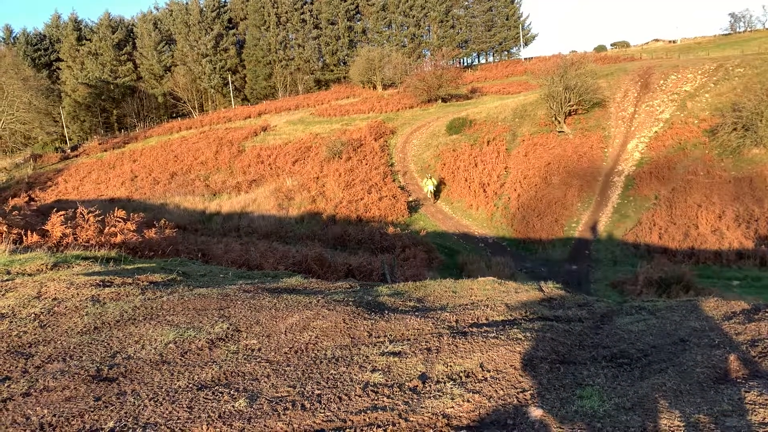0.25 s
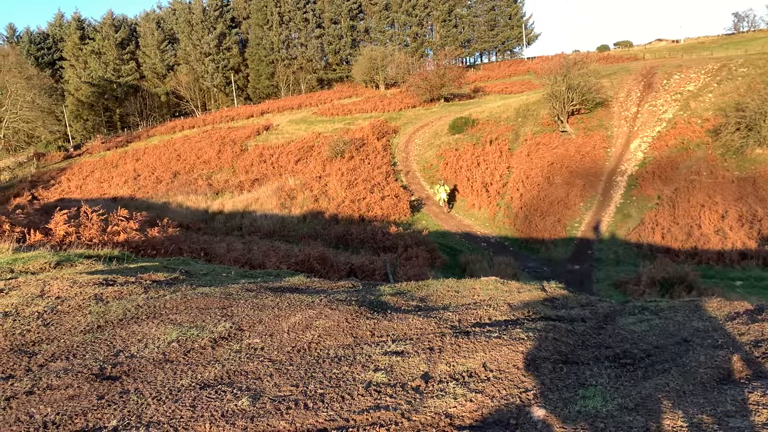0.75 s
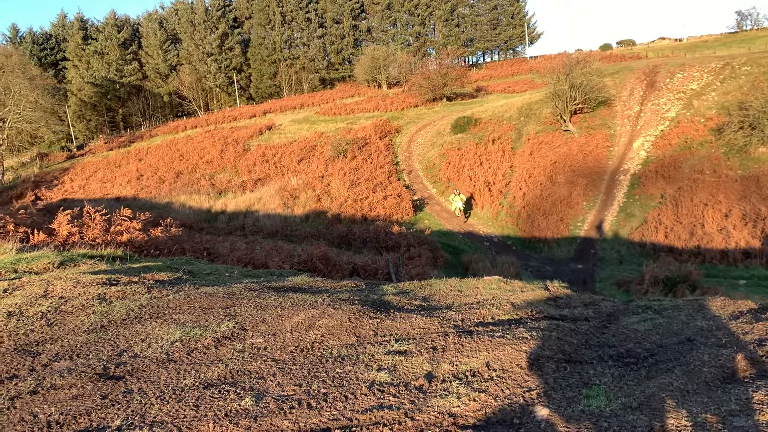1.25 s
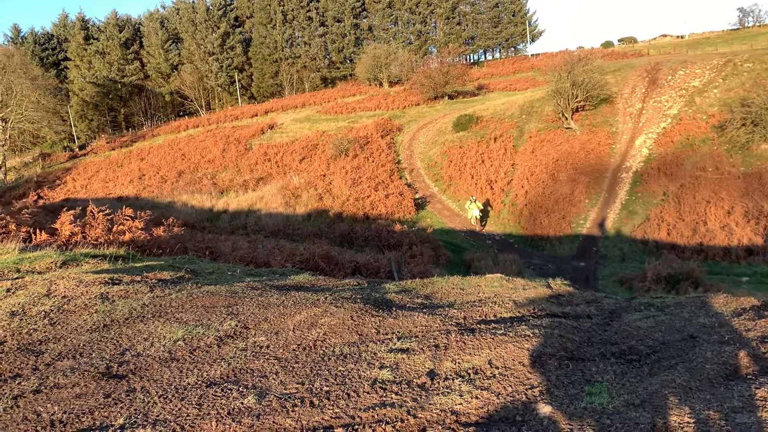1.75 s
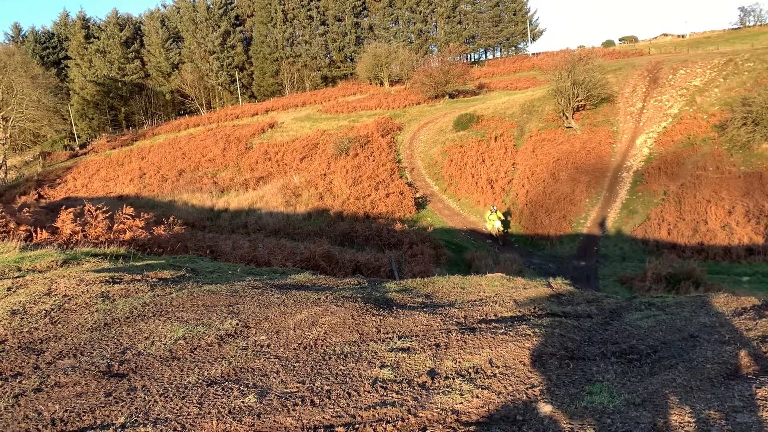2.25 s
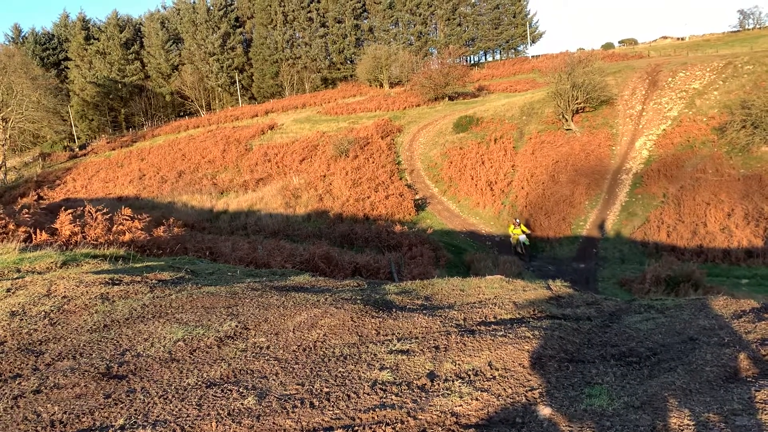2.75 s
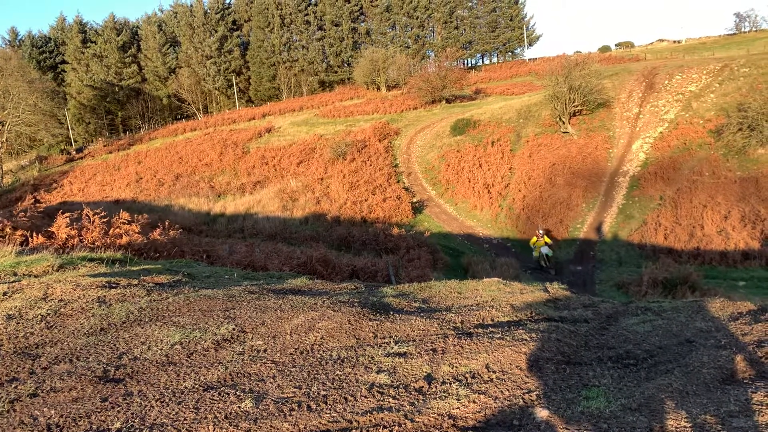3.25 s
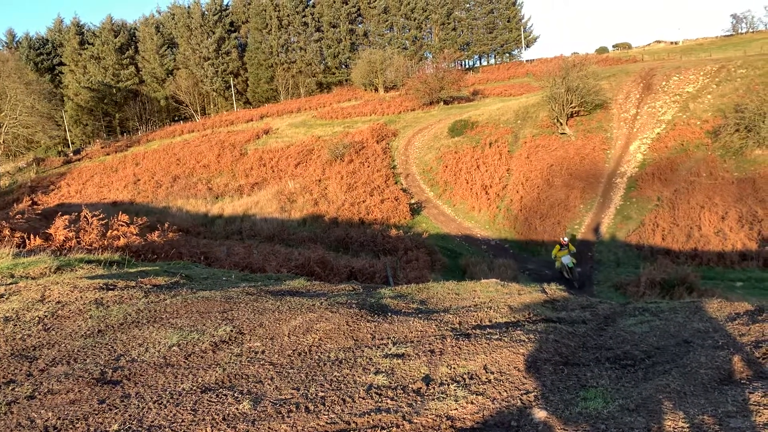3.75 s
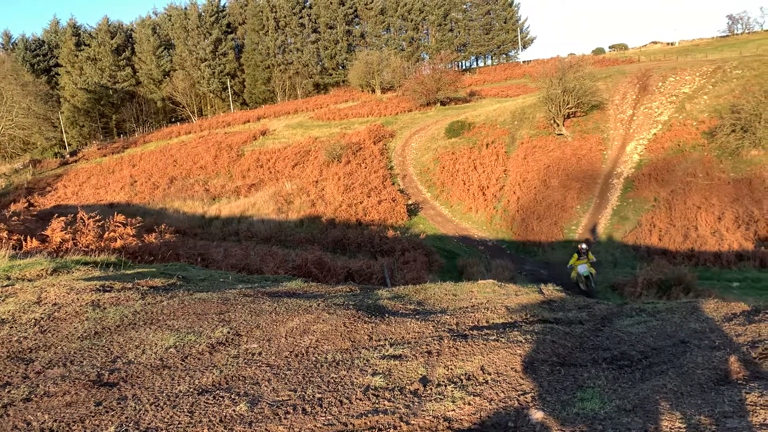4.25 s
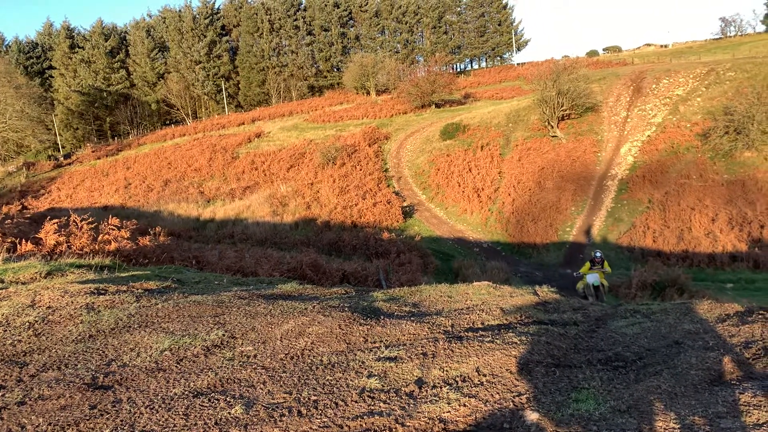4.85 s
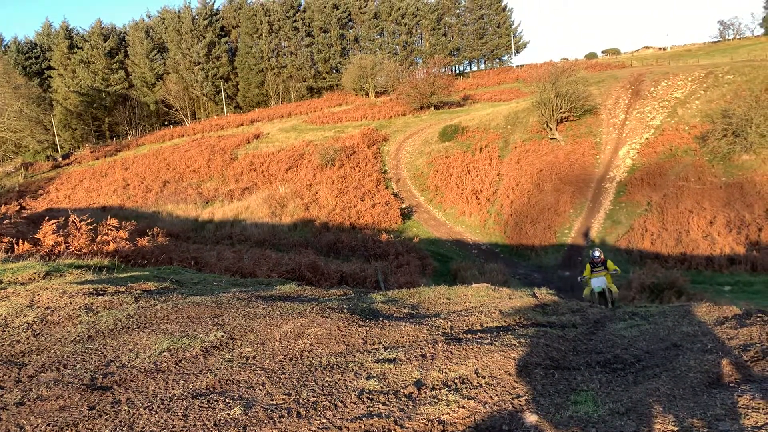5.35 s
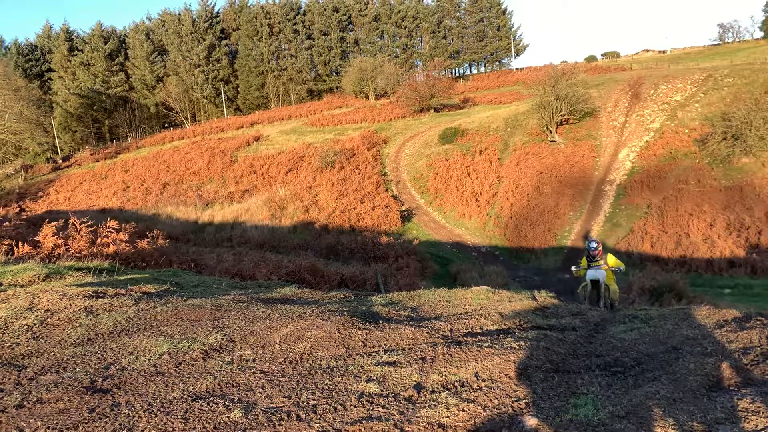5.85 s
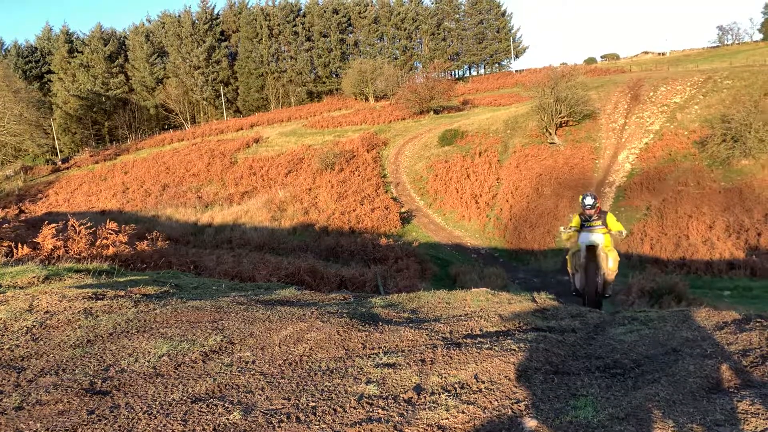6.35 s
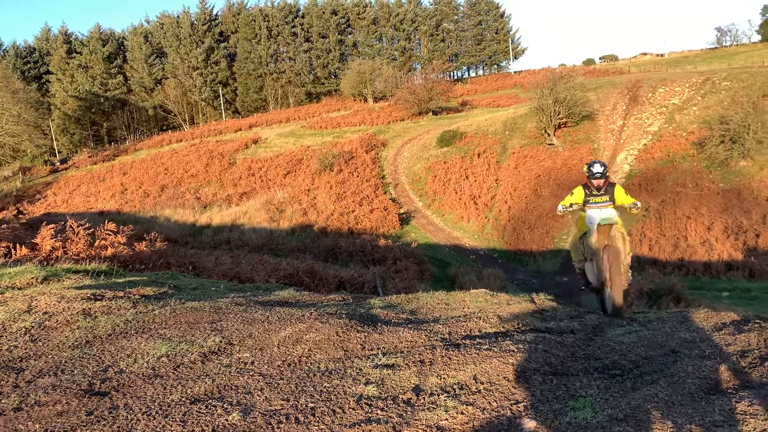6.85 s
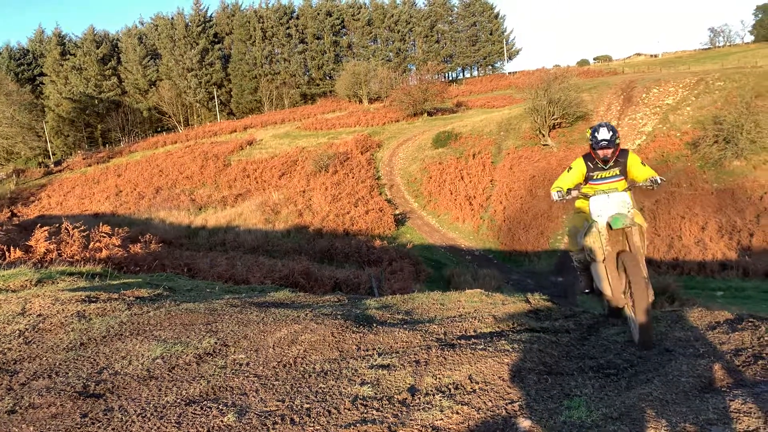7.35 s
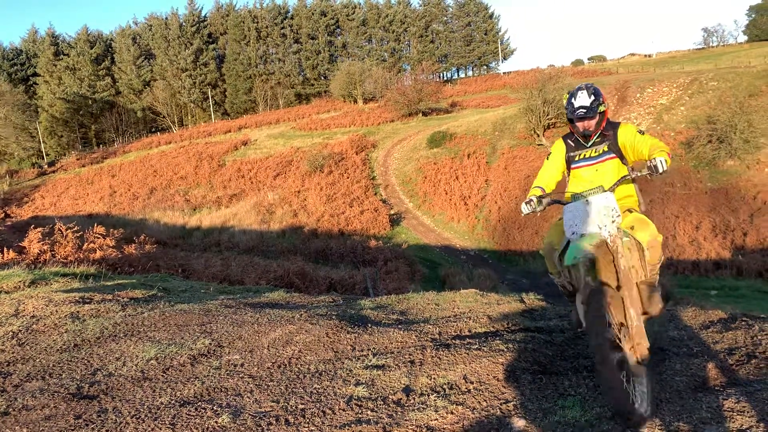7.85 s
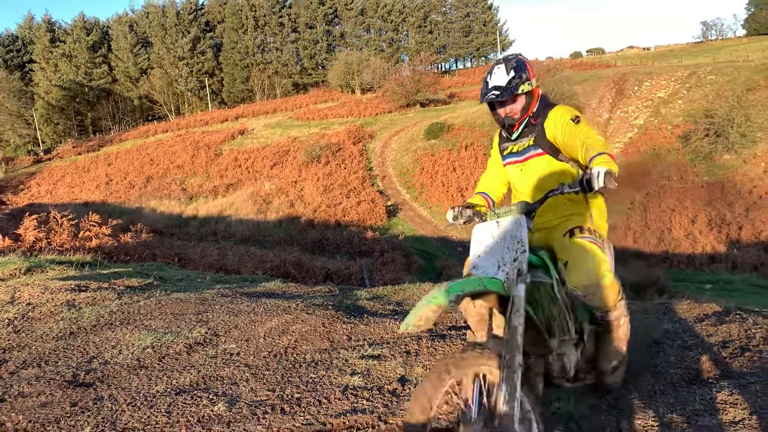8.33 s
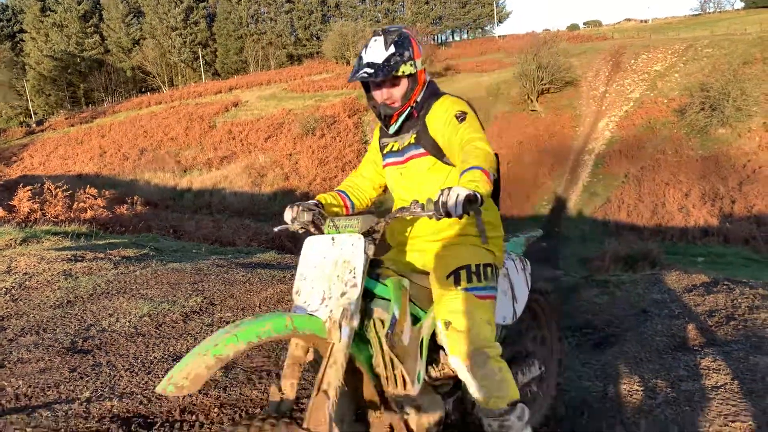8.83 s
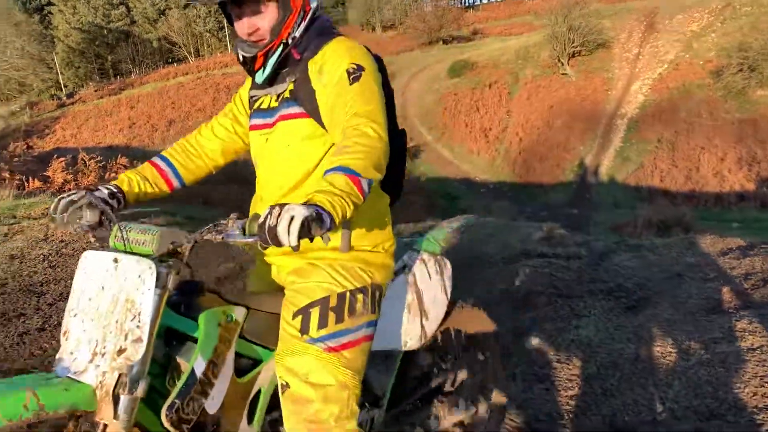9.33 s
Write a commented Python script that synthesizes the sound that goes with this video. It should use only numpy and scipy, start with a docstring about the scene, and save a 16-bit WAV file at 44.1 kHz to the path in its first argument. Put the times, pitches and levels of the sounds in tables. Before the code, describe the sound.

A two-stroke dirt bike coasts down a distant hillside with faint clatter and scattered pops. The throttle opens and the engine barks closer, its revs wavering, rising to one high peak and falling back to short blips. It stops right alongside, popping unevenly with a metallic ring and a sinking gear whine. Gusts of wind thump on the phone microphone, and the hill returns a faint echo.

```python
"""A two-stroke dirt bike coasts down a far hillside, clattering and popping now and then, while wind
buffets the phone's two microphones and the hill scatters the sound back. From about 3 s the throttle
opens: the engine fires on every turn and barks through its tuned exhaust pipe as it climbs the slope.
The revs peak near 6.6 s, then fall back to single pops and short blips. From about 8.3 s the bike is
alongside and stops, still popping, its cooling fins ringing and its gears whining down."""
import sys
import numpy as np
from scipy import signal
from scipy.fft import rfft, irfft, next_fast_len
from scipy.io import wavfile
from scipy.ndimage import uniform_filter1d, map_coordinates

SR = 44100
rng = np.random.default_rng(int(sys.argv[2]) if len(sys.argv) > 2 else 0)


def waveform_to_disk(signal):
    """Save audio, clipped to [-1, 1], as 16-bit WAV at the path in sys.argv[1]."""
    frames = np.transpose(np.atleast_2d(signal))
    scaled = np.clip(frames, -1, 1) * 32767
    samples = np.round(scaled).astype(np.int16)
    wavfile.write(sys.argv[1], SR, samples)


N = 422919
T = np.arange(N) / SR


def amp(db):
    """Turn decibels into a gain."""
    return 10 ** (np.asarray(db) / 20)


def unit(x):
    """Scale a signal to an average power of 1."""
    return x / np.sqrt(np.mean(x ** 2) + 1e-20)


def along(points, hz):
    """Read between (f/Hz, value) points, with octaves evenly spaced."""
    f, values = np.transpose(points)
    return np.interp(np.log(hz + 1), np.log(f + 1), values)


def curves(rows):
    """Join rows that start with a time into one curve for each other column."""
    times, *columns = np.transpose(rows)
    return [np.interp(T, times, column) for column in columns]


def wobble(rate):
    """A smooth random curve through `rate` points a second."""
    return map_coordinates(rng.standard_normal(int(N * rate / SR) + 4), [T * rate])


def filtered(x, response):
    """Scale and delay each frequency of x as response(f) says."""
    size = next_fast_len(N + SR // 8)
    return irfft(rfft(x, size) * response(np.fft.rfftfreq(size, 1 / SR)), size)[..., :N]


def modes(table):
    """The response of something that rings at the given notes: f/Hz, width/Hz, level/dB."""
    return lambda f: sum((-1) ** k * amp(db) * 1j * f * width / (hz * hz - f * f + 1j * f * width)
                         for k, (hz, width, db) in enumerate(table))


def resonate(x, note):
    """Let x ring one note (f/Hz, width/Hz), at a power of 1."""
    return unit(filtered(x, lambda f: modes([(*note, 0)])(f) ** 2))


def glide(rows, fade_in_s):
    """Pitch and level curves from rows of t/s, f/Hz, level/dB, faded at both ends."""
    first, last = rows[0], rows[-1]
    return curves([(first[0] - fade_in_s, first[1], -120), *rows, (last[0] + .05, last[1], -120)])


def hum(rows, width_hz, pulse_db):
    """A pulsing narrow band of noise that follows rows of t/s, f/Hz, level/dB."""
    hz, db = glide(rows, fade_in_s=.03)
    phase = 2 * np.pi * np.cumsum(hz) / SR
    band = unit(wobble(width_hz) * np.cos(phase) + wobble(width_hz) * np.sin(phase))
    return amp(db + pulse_db * wobble(24)) * band


# The tone colour of rushing gas: f/Hz, level/dB
GAS_COLOUR = [(1500, -17), (2500, 12.5), (3300, 7.5), (4200, 7), (5500, 6), (7800, 10.5), (9000, 17),
              (13000, 9), (16000, 2.5)]

def rushing_gas():
    """The bright hiss of gas tearing through a narrow passage."""
    colour = lambda f: amp(along(GAS_COLOUR, f))
    return unit(filtered(rng.standard_normal(N), colour))


# Where the bike is: t/s, position (0 far, 1 climbing, 2 alongside)
POSITION = [(3.02, 0), (3.05, 1), (8.24, 1), (8.29, 2)]

def blend_by_position(versions):
    """Fade between the far, climbing and alongside versions of a sound as the bike comes closer."""
    position, = curves(POSITION)
    return sum(np.clip(1 - abs(position - k), 0, 1) * x for k, x in enumerate(versions))


# The engine casing's notes, one list for each position: f/Hz, width/Hz, level/dB
CASING_NOTES = [
    [(616, 78, 4.5), (973, 84, 4), (1310, 290, -1.5), (1850, 480, 0), (2720, 690, -6.5), (3400, 280, -5),
     (5300, 2600, -20)],
    [(914, 260, 7.5), (1395, 430, 6.5), (1943, 290, 4), (2860, 550, -5.5), (5950, 990, -15)],
    [(544, 190, 8.5), (1130, 500, 4.5), (1880, 560, 3.5), (2600, 750, 0.5), (3220, 670, -3)],
]
# How the engine's background noise rises and falls: t/s, clatter level/dB, hiss level/dB
CLATTER_LEVELS = [(0, -43.5, -68), (1.47, -44.5, -63.5), (2, -36, -45), (2.37, -40, -60),
                  (2.72, -41.5, -57.5), (3.28, -39, -42.5), (3.39, -39, -59.5), (3.45, -31.5, -49),
                  (3.75, -31.5, -37), (5.05, -33.5, -61), (5.69, -26.5, -36.5), (6.6, -25.5, -43),
                  (6.78, -34.5, -79), (7.21, -28, -41), (7.8, -32, -59.5), (8.52, -20.5, -34.5),
                  (8.79, -23.5, -37), (9.59, -24.5, -39.5)]

def clatter():
    """Piston, chain and clutch rattle the casing, while air hisses into the engine."""
    clatter_db, hiss_db = curves(CLATTER_LEVELS)
    rattle = amp(2.6 * wobble(70) + .4 * wobble(8)) * rng.standard_normal(N)
    knocks = blend_by_position([unit(filtered(rattle, modes(notes))) for notes in CASING_NOTES])
    hiss = amp(hiss_db - 4 + 7.3 * wobble(8.5)) * rushing_gas()
    return amp(clatter_db - 5.5) * knocks + hiss


# The casing's distant ring, and a whine above it: t/s, f/Hz, level/dB
DISTANT_RING = [(0, 1230, -61), (.5, 1258, -51), (.9, 1250, -53), (1.2, 1276, -49), (1.7, 1280, -47.5),
                (2, 1328, -71), (2.5, 1344, -55), (3, 1340, -63)]
DISTANT_WHINE = [(0, 2450, -47), (.25, 2250, -55), (.4, 1974, -55), (1.5, 1960, -55), (2.4, 2020, -68)]

def distant_ringing():
    """From afar the casing rings faintly, along with a higher whine."""
    return hum(DISTANT_RING, width_hz=200, pulse_db=2.5) + hum(DISTANT_WHINE, width_hz=450, pulse_db=3)


# The strength of the breeze: t/s, level/dB
BREEZE_LEVELS = [(0, -35.5), (.7, -36), (2.4, -33), (2.9, -36.5), (3.6, -31), (4.4, -24.5), (6.4, -22.5),
                 (6.8, -27), (7.2, -21.5), (8.2, -24), (8.5, -30), (9.59, -33)]
# Single gusts: t/s, thud level/dB, flutter level/dB
WIND_GUSTS = [(.13, -30.5, -51.5), (.48, -33.5, -57), (2.96, -28.5, -43), (3.15, -32, -32.5),
              (3.31, -27, -46), (3.55, -23.5, -50), (4.3, -24, -39), (4.572, -17, -24), (4.683, -50, -18.5),
              (4.79, -38, -26), (5.15, -35, -25.5), (4.921, -22.5, -28.5), (5.31, -23, -35),
              (5.77, -21, -41), (5.911, -33, -21.5), (6.06, -23.5, -47), (7.178, -43, -38),
              (7.489, -14.5, -16.5), (7.64, -22, -31), (7.862, -22, -29), (8.33, -18.5, -27),
              (8.95, -26.5, -47)]
GUST_HALF_S, BREEZE_TOP_HZ = 0.046, 490

def wind():
    """Swirls of air thump both microphones, partly alike; faster ones flutter; gusts stand out."""
    def lumps(depth_db, rate):
        return amp(depth_db * (wobble(rate) + np.array([wobble(rate), wobble(rate)])))

    strength_db, = curves(BREEZE_LEVELS)
    power = amp(strength_db) ** 2 * [[1], [0]]  # rows: thud, flutter
    for time, *db in WIND_GUSTS:
        power = power + (amp(db)[:, None] * np.exp(-((T - time) / GUST_HALF_S) ** 2)) ** 2
    thud_gain, flutter_gain = np.sqrt(power)
    shared, left, right = rng.standard_normal((3, 2, N))
    alike = np.array([[1.1], [2.2]]) * shared
    low, high = np.swapaxes([alike + left, alike + right], 0, 1)
    thud = filtered(low, lambda f: modes([(52, 50, 0), (135, 100, -4)])(f) / (1 + (f / 260) ** 4))
    flutter = filtered(high, lambda f: modes([(220, 330, 0)])(f) ** 3)
    soft_flutter = filtered(flutter[:, ::-1], lambda f: 1 / (1 + (f / BREEZE_TOP_HZ) ** 3))
    breeze_db = -51 + 1.386 * (strength_db + 38)  # swings wider than the thud
    breeze = amp(breeze_db) * unit(lumps(2.7, 22) * soft_flutter)
    thud = thud_gain * unit(lumps(2.35, 14) * thud)
    flutter = flutter_gain * unit(lumps(1.5, 30) * flutter)
    return amp(5) * (thud + flutter + breeze)


# Single firings: t/s, puff level/dB, crack level/dB, ring level/dB
FIRINGS = [(.306, -43.5, -27.5, -58), (0.582, -32, -28, -54), (0.904, -41, -23.5, -48),
           (1.056, -41, -28.5, -43), (1.212, -35, -24, -57), (1.516, -34, -24, -36),
           (1.579, -25.5, -21.5, -47), (1.656, -35, -28, -53), (1.76, -32, -34, -40),
           (1.878, -26, -32, -36), (1.918, -17, -22, -38), (1.958, -26, -30, -33), (2.002, -23, -25, -38),
           (2.121, -20.5, -21, -32), (2.162, -35, -28, -34), (2.294, -28.5, -22, -37),
           (2.399, -33, -20, -34), (2.632, -38, -27, -36), (2.733, -31.5, -28.5, -35),
           (3.039, -30, -33, -38), (3.421, -25.5, -22, -18), (6.725, -17, -41, -11.5),
           (6.737, -35, -41, -16), (6.767, -17.5, -33, -11), (6.782, -26, -25, -18),
           (6.805, -20.5, -35, -10.5), (6.818, -51, -40, -19), (7.415, -18.5, -18, -10.5),
           (7.696, -22.5, -23, -14.5), (7.835, -25.5, -26, -15.5), (8.042, -20.5, -18, -16.5),
           (8.096, -16, -11, -19), (8.161, -22, -22, -20.5), (8.423, -13.5, -13, -12.5),
           (8.465, -16, -25, -7), (8.508, -35, -29, -20), (8.548, -30, -30, -24), (8.588, -25, -28, -11),
           (8.618, -38, -40, -26), (8.684, -16.5, -19, -8.5), (8.774, -19, -42, -9.5),
           (8.847, -25, -22, -11), (8.888, -31, -36, -12.5), (8.947, -26, -22, -10),
           (8.985, -31, -35, -13.5), (9.039, -34, -36, -14.5), (9.075, -39, -36, -13),
           (9.16, -16, -9.5, -5.5), (9.277, -20, -16, -8.5), (9.325, -38, -34, -16.5),
           (9.401, -19, -35, -7), (9.505, -17, -12, -7.5), (9.56, -34, -32, -17.5)]
# The pipe's lower note, which sinks as the engine slows: t/s, f/Hz
LOW_NOTE = [(8.1, 427), (8.45, 485), (8.8, 455), (8.95, 380), (9.5, 369)]
# How much of the ring is that lower note: t/s, share (0 to 1)
LOW_NOTE_SHARE = [(6.82, 0.066), (7.4, 0.8), (8.05, 0.38), (8.09, 0.13), (8.45, 0.45), (8.8, 0.39),
                  (8.98, 0.34), (9.16, 0.58), (9.55, 0.64)]
# The tailpipe's broad snap: f/Hz, width/Hz, level/dB
CRACK_NOTES = [(507, 500, -4), (1960, 800, -0.5), (3500, 76, -3)]
HIGH_NOTE_HZ, RING_S = 604, 0.0091
SIDE_NOTES_HZ, SIDE_DB = (534, 798), -11.5  # weaker notes either side of the high one

def pops():
    """Each lone firing gives a puff of gas, a snap at the tailpipe and a short ring in the pipe."""
    out, cracks = np.zeros((2, N + SR))
    gas, grit = np.pad([rushing_gas(), rng.standard_normal(N)], ((0, 0), (0, SR)))
    low_share = np.clip(curves(LOW_NOTE_SHARE)[0], 0, 1)
    low_hz, = curves(LOW_NOTE)
    t = T[:SR // 8]
    late = np.maximum(t - .0045, 0)  # the ring comes round the pipe a little later
    note = lambda hz, db=-1: amp(db) * np.sin(2 * np.pi * hz * late)
    high = note(HIGH_NOTE_HZ) + sum(note(hz, SIDE_DB) for hz in SIDE_NOTES_HZ)
    ring_shape = (1 - np.exp(-late / 0.00068)) * np.exp(-(late / RING_S) ** 2)
    puff = amp(-9.5) * (1 - np.exp(-t / 0.0024)) * (amp(-60 * t / 0.063) + 0.23 * amp(-60 * t / 0.17))
    snap = amp(2.5) * np.exp(-((t - .004) / 0.003) ** 2)
    for time, puff_db, crack_db, ring_db in FIRINGS:
        start = round(time * SR)
        span = slice(start, start + len(t))
        ring = ring_shape * (low_share[start] * note(low_hz[start]) + (1 - low_share[start]) * high)
        out[span] += amp(puff_db) * puff * gas[span] + amp(ring_db) * ring
        cracks[span] += amp(crack_db) * snap * grit[span]
    return out[:N] + filtered(cracks[:N], modes(CRACK_NOTES))


# Stretches of open throttle: start t/s, end t/s, bark level/dB at start and at end, roughness (0 to 1),
# then boom, snarl and rasp level/dB compared with the bark
THROTTLE_STRETCHES = [(3.068, 3.26, -33, -32.5, 0.51, 4, -3, -7),
                      (3.416, 3.907, -31, -24, 0.3, 1, -14, -12),
                      (3.916, 4.563, -22, -22, 0.41, -2, -20, -17.5),
                      (4.564, 4.84, -21, -25.5, 0.42, -22, -18, -19.5),
                      (4.844, 5.173, -17.5, -16.5, 0.26, -6, -21.5, -22.5),
                      (5.166, 5.322, -19.5, -18.5, 0.22, -4.5, -17, -23),
                      (5.319, 5.786, -18, -18.5, 0.28, -3, -19, -22.5),
                      (5.789, 6.013, -16, -15, 0.24, -6, -22, -22.5),
                      (6.035, 6.125, -23, -25, 0.84, -13, -32, -14),
                      (6.135, 6.182, -15.5, -19.5, 0.9, -10, -32, -17),
                      (6.2, 6.427, -24, -19, 0.78, -9.5, -30, -17),
                      (6.422, 6.502, -14, -10, 0.17, -11, -19, -18.5),
                      (6.5, 6.695, -15, -24, 0.1, 0, -24, -16), (6.84, 7.046, -30, -31.5, 0.66, -4, -7, -7),
                      (7.061, 7.241, -26.5, -23, 0.3, 4, -5.5, -7.5),
                      (7.415, 7.557, -37, -35.5, 0.2, -2, 1, -1),
                      (8.284, 8.397, -20.5, -17, 0.61, -12, -14, -9)]
OPEN_S, CLOSE_S = 0.0047, 0.041
SLIP_DB, BOG_DB, BOG_ROUGHNESS = 0.29, 0.68, .07  # for each turn a second gained (slip) or lost (bog)
BOOM_FOLLOWS, RASP_FOLLOWS = 0.39, 0.8  # share of the bark's swell
SNARL_DB_PER_OCTAVE, RASP_DB_PER_OCTAVE = -19, 15.5

def throttle(speed, octaves):
    """Gains and roughness under throttle: louder as the engine races, quieter and rougher as it bogs."""
    surge = np.clip(speed - uniform_filter1d(speed, size=int(.25 * SR)), -6, 6)
    gained, lost = np.maximum(surge, 0), np.maximum(-surge, 0)
    gains, roughness = np.zeros((4, N)), []
    for start, end, start_db, end_db, rough, boom_db, snarl_db, rasp_db in THROTTLE_STRETCHES:
        gate = np.clip(np.minimum((T - start) / OPEN_S, 1 + (end - T) / CLOSE_S), 0, 1) ** 2
        mean_db = (start_db + end_db) / 2
        ramp_db = np.interp(T, [start, end], [start_db, end_db]) - mean_db
        swell_db = ramp_db + SLIP_DB * gained - BOG_DB * lost
        layers_db = [swell_db,
                     boom_db + BOOM_FOLLOWS * swell_db,
                     snarl_db + swell_db + SNARL_DB_PER_OCTAVE * octaves,
                     rasp_db + RASP_FOLLOWS * swell_db + RASP_DB_PER_OCTAVE * octaves]
        gains = np.maximum(gains, gate * amp(mean_db + np.array(layers_db)))
        roughness += [(start, rough), (end, rough)]
    return gains, np.clip(curves(roughness)[0] + BOG_ROUGHNESS * lost, 0, 1)


# The pipe's usual notes, and its higher, wider ones under load: f/Hz, width/Hz, level/dB
PIPE_NOTES = [(556.7, 45.6, 10), (835, 280, -27.5)]
LOADED_NOTES = [(624, 120, -1), (837, 37, -2.5)]
# How much of the loaded sound is heard: t/s, share (0 to 1)
LOADED_SHARE = [(3.9, 0.1), (4.7, 0.24), (4.92, 0.67), (5.1, 0.49), (5.2, 0.23), (5.3, 0.49), (5.4, 0.39),
                (5.55, 0.5), (5.65, 0.55), (5.75, 0.28), (5.9, 0.32), (6.05, 0.56), (6.5, 0.95),
                (6.7, 0.49), (8.3, 0.25)]
# The silencer's two clear, nasal notes: f/Hz, width/Hz
NASAL_NOTES = [(1075, 80), (1360, 100)]
# Their strength compared with the bark: t/s, lower note level/dB, upper note level/dB
NASAL_LEVELS = [(3.45, -9.5, -7), (3.9, -22, -22), (4.05, -19, -11.5), (4.4, -36, -14.5), (4.55, -47, -23),
                (4.9, -21, -23), (5.4, -17, -15), (5.68, -9.5, -19), (5.8, -14.5, -22), (6, -25, -17),
                (6.5, -29, -24), (6.62, -17, -22), (7, -11, -8)]
# The pipe's lowest note compared with the bark: t/s, level/dB
LOWEST_LEVELS = [(3.75, -3.5), (4.05, -8), (4.5, -9), (4.85, -16.5), (5.12, -9.5), (5.25, -9), (5.65, -4),
                 (5.8, -16), (6.05, -9.5), (6.4, -6.5), (6.6, -5.5), (7, 0), (7.6, -13), (8.25, -14)]
LOWEST_NOTE, SCREAM_BAND = (381, 88), (550, 1500)  # f/Hz, width/Hz
PIPE_TOP_HZ, SCREAM_DB = 875, 3.4

def pipe_bark(blasts, rough_gas, octaves):
    """Blasts ring the notes of the exhaust; at high revs the whole pipe screams."""
    def pipe(notes):
        band = lambda f: (1j * f / (1j * f + 380)) ** 4 / (1 + (f / PIPE_TOP_HZ) ** 20)
        return unit(filtered(blasts + .4 * rough_gas, lambda f: modes(notes)(f) * band(f)))

    load = np.clip(curves(LOADED_SHARE)[0], 0, 1)
    body = (1 - load) * pipe(PIPE_NOTES) + load * pipe(LOADED_NOTES)
    nasal = sum(amp(db) * resonate(blasts, note) for db, note in zip(curves(NASAL_LEVELS), NASAL_NOTES))
    lowest = amp(curves(LOWEST_LEVELS)[0]) * resonate(blasts + .5 * rough_gas, LOWEST_NOTE)
    scream = unit(filtered(blasts, lambda f: modes([(*SCREAM_BAND, 0)])(f) / (1 + (f / 1750) ** 6)))
    return body + lowest + nasal - octaves ** 2 * amp(SCREAM_DB) * scream


# Engine speed, in turns a second: t/s, f/Hz
ENGINE_SPEED = [(3.07, 71), (3.15, 71.5), (3.26, 81.5), (3.42, 70), (3.5, 69.7), (3.56, 75.7), (3.61, 74.5),
                (3.64, 77.4), (3.68, 76.7), (3.77, 85.6), (3.9, 75.6), (4.01, 88), (4.04, 88.5), (4.08, 83),
                (4.2, 79.8), (4.22, 81.9), (4.3, 78.7), (4.36, 81.4), (4.43, 76.4), (4.5, 82.2),
                (4.55, 81.3), (4.61, 74), (4.655, 85.5), (4.715, 74.5), (4.79, 81), (4.84, 77),
                (4.88, 78.5), (4.92, 81.2), (4.95, 80), (4.985, 81.8), (5.025, 80.2), (5.07, 84.4),
                (5.14, 84), (5.2, 93.8), (5.23, 94.9), (5.32, 84.5), (5.35, 88.7), (5.42, 87.7),
                (5.53, 94.9), (5.555, 93.4), (5.6, 83.7), (5.655, 89.2), (5.7, 86.3), (5.736, 86.6),
                (5.75, 85.6), (5.79, 80.5), (5.85, 86.5), (5.886, 87), (5.92, 84), (5.95, 84), (5.99, 81.4),
                (6.1, 77.8), (6.14, 75.4), (6.2, 76.8), (6.28, 86), (6.33, 84.9), (6.38, 86), (6.47, 93),
                (6.568, 126.8), (6.585, 131), (6.61, 133.7), (6.712, 115), (6.85, 68), (7, 54), (7.1, 50),
                (7.28, 77), (7.4, 44), (8.28, 50), (8.45, 68)]
# The silencer's snarling notes: f/Hz, width/Hz, level/dB
SILENCER_NOTES = [(974, 64, 3), (1390, 71, 9), (1910, 380, 2.5), (3360, 390, -13)]
CHAMBER_NOTE = (176, 43)  # the boom of the exhaust's wide chamber: f/Hz, width/Hz

def engine_pulling():
    """One blast on every turn rings chamber, pipe and silencer; a gush of gas follows each blast."""
    speed, = curves(ENGINE_SPEED)
    octaves = np.maximum(np.log2(speed / 80), 0)  # doublings of speed above 80 turns a second
    (bark_gain, boom_gain, snarl_gain, rasp_gain), rough = throttle(speed, octaves)
    turns = np.cumsum(speed * (1 + .003 * wobble(25)) / SR) + rough ** 2 * .09 * wobble(60)
    fires = np.flatnonzero(np.diff(np.maximum.accumulate(np.floor(turns))) > 0)  # each new whole turn
    size_db = (.5 + 2.5 * rough[fires]) * rng.standard_normal(len(fires))
    blasts = np.zeros(N)
    blasts[fires] = amp(size_db) * np.sqrt(SR / speed[fires])
    gush = unit((0.87 + np.exp(-5 * (turns % 1))) * amp(2.1 * wobble(40)))
    gas = gush * rng.standard_normal(N)
    bark = bark_gain * pipe_bark(blasts, rough * gas, octaves)
    boom = boom_gain * resonate(blasts, CHAMBER_NOTE)
    snarl = snarl_gain * unit(filtered(blasts + (.03 + .3 * rough) * gas, modes(SILENCER_NOTES)))
    rasp = rasp_gain * gush * rushing_gas()
    return bark + boom + snarl + rasp


# A thin whistle early in the climb: t/s, f/Hz, level/dB
THIN_WHISTLE = [(3.5, 5300, -70), (3.57, 5330, -55), (3.9, 5480, -55.5), (4.05, 5530, -55),
                (4.12, 5540, -66)]

def whistle():
    """A faint high tone wavers as it rises."""
    hz, db = glide(THIN_WHISTLE, fade_in_s=.02)
    gain = np.sqrt(2) * amp(db + 2.5 * wobble(25))
    return gain * np.sin(2 * np.pi * np.cumsum(hz + 36 * wobble(60)) / SR)


# The cylinder's cooling fins, one list for each note: t/s, f/Hz, level/dB
FIN_NOTES = [
    [(8.45, 1075, -41), (8.9, 997, -35), (9.5, 1100, -53)],
    [(8.45, 1504, -37), (9.5, 1457, -48)],
    [(8.45, 1821, -42), (9.5, 1814, -39)],
]

def fins_ringing():
    """Close by, the engine's thin metal fins can be heard ringing."""
    return sum(hum(note, width_hz=220, pulse_db=3) for note in FIN_NOTES)


# The note of the gears: t/s, f/Hz, level/dB
GEAR_NOTE = [(8.45, 490, -26), (8.65, 439.3, -35), (8.9, 405, -46), (9.04, 388, -34), (9.3, 334, -34.5),
             (9.55, 319, -47)]

def gear_whine():
    """The gears whine lower and lower as the bike stops."""
    return hum(GEAR_NOTE, width_hz=22, pulse_db=1.5)


# How far the left microphone is ahead of the right, one list for each position: f/Hz, lead/cycles
LEFT_LEAD = [
    [(200, 0), (1400, -.06), (2300, -.27), (3100, -.5), (4400, -.5), (5300, -.6), (6300, -1), (7500, -1),
     (9000, -.5)],
    [(200, 0), (1200, -.11), (2120, -.33), (2420, -.5), (3800, -1), (4100, -1.5), (4800, -1.7),
     (5700, -2.4), (7200, -2.85), (7900, -2.8), (9000, -2.5)],
    [(200, 0), (1100, 0), (2400, -.16), (3300, -.6), (4200, -.3), (5100, -.3), (5900, 0), (6700, 0),
     (7300, .23), (9000, .5)],
]
# Extra lead in the treble, at any position: f/Hz, lead/cycles
TREBLE_LEAD = [(10700, 0), (11900, .5), (14300, .5), (16000, .95)]
# How much louder the left is than the right: f/Hz, level/dB
LEFT_LOUDER = [(1000, 0), (2000, 1), (3500, 0), (5000, 4.5), (7000, 3.5), (8400, 0)]
# Treble cut or lift at TREBLE_HZ, one for each position: level/dB
TREBLE_LEVELS = [-6.5, 2.5, 0]
TREBLE_HZ = 10900

def microphones(x):
    """The phone's body delays and shades the sound between its microphones; far off, air dulls it."""
    versions = []
    for lead, treble_db in zip(LEFT_LEAD, TREBLE_LEVELS):
        shift = lambda f: np.exp(2j * np.pi * (along(lead, f) + along(TREBLE_LEAD, f)) * [[1], [0]])
        gain = lambda f: amp(treble_db * (f / TREBLE_HZ) ** 2 + along(LEFT_LOUDER, f) * [[.5], [-.5]])
        versions.append(filtered(x, lambda f: shift(f) * gain(f)))
    return blend_by_position(versions)


# How long the hill's echo takes to fade by 60 dB: f/Hz, t/s
ECHO_FADE = [(300, 0.93), (2000, 0.12), (10000, 0.019)]
# The tone colour of the echo: f/Hz, level/dB
ECHO_COLOUR = [(400, -26), (1200, -13), (2500, -8), (6500, 6.5), (9000, -13.5), (15000, 4)]
NEW_ECHO_S = .2

def hill_echo(x):
    """The hill scatters sound back, differently at each microphone and as the bike moves on."""
    hop = int(NEW_ECHO_S * SR)
    count = N // hop + 2
    padded = np.pad(x, (hop, 3 * hop))
    pieces = padded[hop * np.arange(count)[:, None] + np.arange(2 * hop)]
    pieces = pieces * signal.get_window("hann", 2 * hop)
    # each overlapping piece gets its own tail of fading noise
    hz, t, spectra = signal.stft(rng.standard_normal((2, count, hop)), SR, nperseg=256)
    fade = amp(-60 * t / along(ECHO_FADE, hz)[:, None])
    tails = signal.istft(spectra * fade, SR, nperseg=256)[1][..., :hop]
    echoes = signal.fftconvolve(pieces[None], tails * np.sqrt(count) / np.linalg.norm(tails[0]), axes=2)
    joined = np.zeros((2, (count + 3) * hop))
    for k in range(count):
        joined[:, k * hop:][:, :echoes.shape[2]] += echoes[:, k]
    return filtered(joined[:, hop:hop + N], lambda f: amp(along(ECHO_COLOUR, f)))


BASS_FOOT_HZ, BASS_TOP_HZ = 85, 240

def bass_lag(x):
    """Partway up the climb, the bass on the left falls behind the bass on the right."""
    left, right = x
    lag, = curves([(4.9, 0), (5.3, .27), (9.59, .3)])  # t/s, lag/cycles
    band = lambda f: 1 / (1 + (f / BASS_TOP_HZ) ** 8) / (1 + (BASS_FOOT_HZ / (f + 1)) ** 4)
    bass = filtered(left, band)
    late_bass = np.real(signal.hilbert(bass, next_fast_len(N))[:N] * np.exp(-2j * np.pi * lag))
    return np.array([left - bass + late_bass, right])


def scene():
    """The bike, its echo and the wind, at the left and right microphones."""
    bike = clatter() + distant_ringing() + pops() + engine_pulling()
    bike += whistle() + fins_ringing() + gear_whine()
    return bass_lag(microphones(bike) + hill_echo(bike) + wind())


def record(dry):
    """The phone cuts the deepest bass, rounds off peaks and drops the very highest treble."""
    low_cut_hz, top_hz = 40, 15900
    trimmed = filtered(dry, lambda f: (1j * f / (1j * f + low_cut_hz)) ** 3)
    rounded = trimmed / (1 + abs(trimmed / .95) ** 6) ** (1 / 6)
    return filtered(rounded, lambda f: f < top_hz)


dry = scene()
out = record(dry)
waveform_to_disk(out)
```